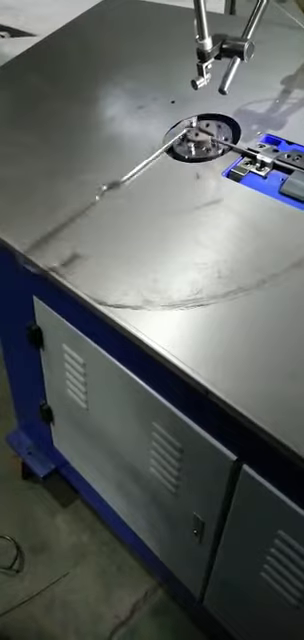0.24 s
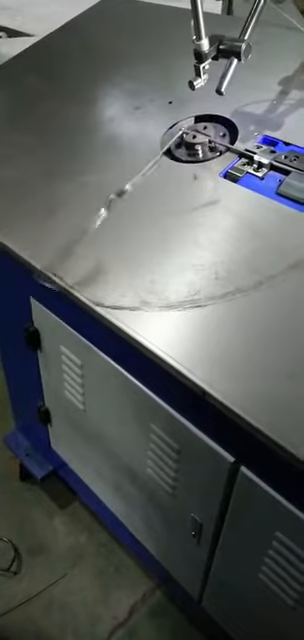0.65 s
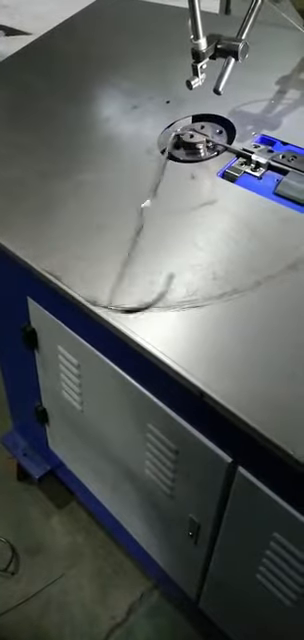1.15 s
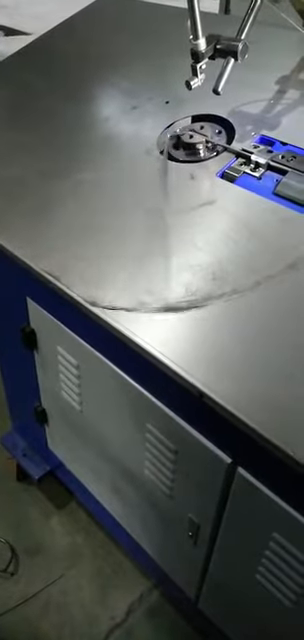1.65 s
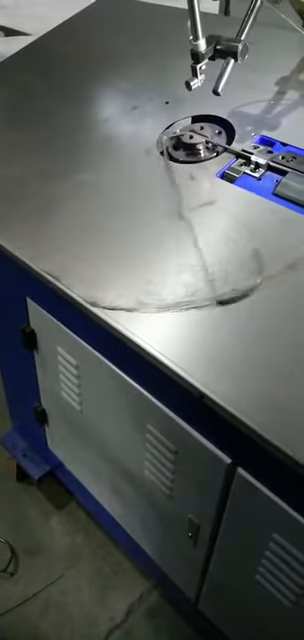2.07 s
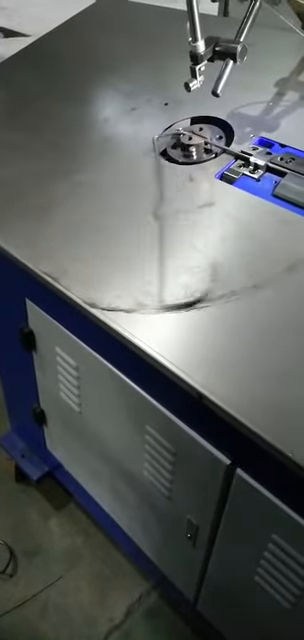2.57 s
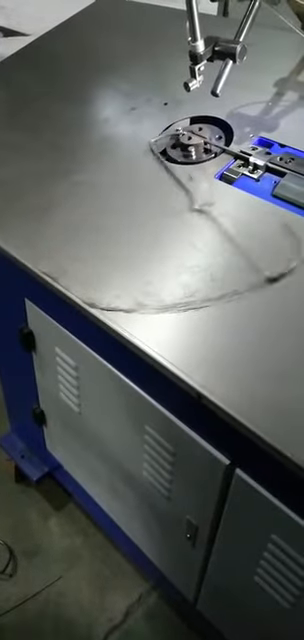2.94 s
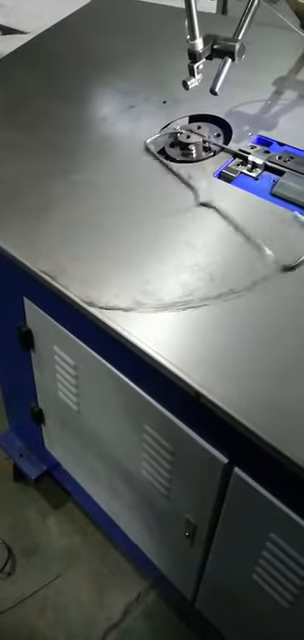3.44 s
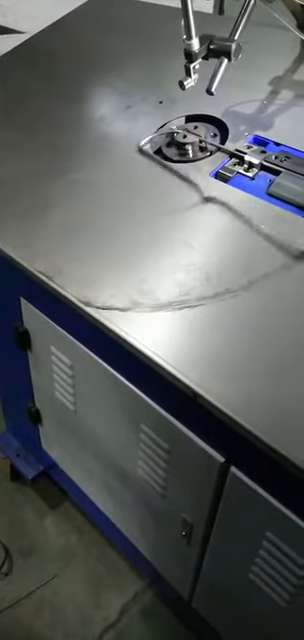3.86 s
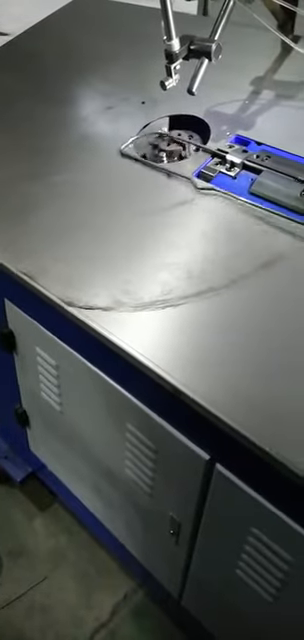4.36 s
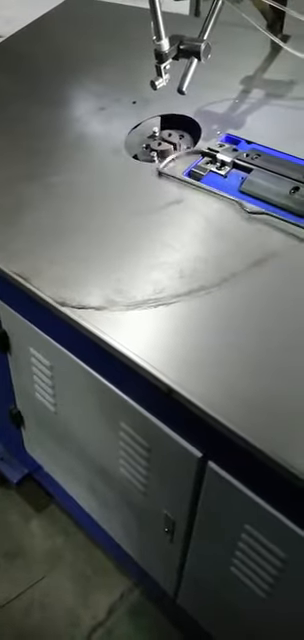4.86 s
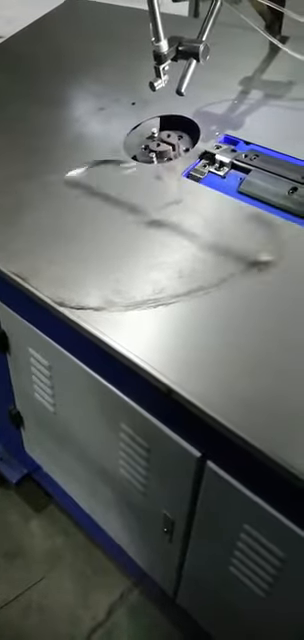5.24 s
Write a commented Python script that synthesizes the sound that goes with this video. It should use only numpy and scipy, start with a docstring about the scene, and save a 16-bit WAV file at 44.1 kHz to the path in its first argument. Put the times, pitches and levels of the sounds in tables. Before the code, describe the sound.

A wire-bending machine works in a workshop, heard close in stereo over its steel table. From the start the wire rubs the sheet with bright, gritty, uneven scraping, mostly toward the right, with fleeting singing tones. Light ticks and soft slaps fall around 0.25, 0.4, 0.57 and 1.02 s, while cabinet panels give faint low shudders. Scraping swells again near 1.2 s, eases around 1.7 s, and strengthens by 2.4 s, with clicks at 1.83, 2.24 and 2.64 s. From 3.05 to 3.75 s the contacts crowd together: sharp pings and dry chattering slaps, strongest around 3.26, 3.53 and 3.66 s. Softer rattles and rubbing follow until about 4.2 s, then the wire quiets, leaving hum and low drones. A short motor whine rises near 4.9 s; a quick clatter hits at 5.0 and 5.14 s, and scraping returns to the end.

```python
"""A steel wire scrapes over a sheet-steel table, then slaps and chatters on it, close to a two-port microphone.
Rubbing is uneven noise and blows are short chatters of noise, both coloured by the table's modes; hard ticks ping.
It is a wire-bending machine in a workshop: its cabinet booms on wavering tones and its motor whines shortly.
Behind it the drives drone as noise-rung resonances and the shop hums as patchy random spectra.
Table levels are nominal: each source sets them against its own offsets and port balance."""
import sys
import numpy as np
from scipy import signal
from scipy.io import wavfile
from scipy.ndimage import uniform_filter1d

SR = 44100
rng = np.random.default_rng(int(sys.argv[2]) if len(sys.argv) > 2 else 0)


def unload_audio(sound):
    """Save the sound as a 16-bit wav file, at the path given as the first command line argument."""
    columns = np.transpose(np.atleast_2d(sound))
    # keep every value between -1 and 1, then stretch to whole-number steps
    steps = np.round(np.clip(columns, -1, 1) * 32767)
    wavfile.write(sys.argv[1], SR, steps.astype(np.int16))


N = 242550  # samples: 5.5 s
PORT_SIDES = (.5, -.5)  # left, right: each port takes half of a left-minus-right level


def gain_of(db):
    """Decibels to gain."""
    return 10 ** (np.asarray(db) / 20)


def evened(x):
    """Scales to rms 1."""
    return x / np.sqrt(np.mean(x ** 2) + 1e-20)


def read(points, hz):
    """A spectrum table on a log-frequency axis."""
    f, value = np.transpose(points)
    return np.interp(np.log(hz + 1), np.log(f + 1), value)


def curves(rows):
    """The columns of a curve table at every sample."""
    s, *columns = np.transpose(rows)
    return [np.interp(np.arange(N) / SR, s, c) for c in columns]


def patches_of(shape, hz_bins, frames):
    """Random patches of rms 1 over frequency and time, smoothed along both."""
    across = uniform_filter1d(rng.standard_normal(shape), size=hz_bins, axis=0)
    return evened(uniform_filter1d(across, size=frames, axis=1))


def minimum_phase(gain):
    """Full causal spectrum with this gain and the least delay, found from the log gain."""
    log_gain = np.log(np.r_[gain, gain[-2:0:-1]])
    return np.exp(np.conj(signal.hilbert(log_gain)))


def colour(x, db, lo_hz, hi_hz, band_hz):
    """Causal filter for the part lo-hi of spectrum db, levelled by its unlimited spectrum within band_hz."""
    hz = np.fft.rfftfreq(2048, 1 / SR)
    inside = (hz > band_hz[0]) & (hz < band_hz[1])
    gain = gain_of(db) / np.sqrt(np.sum(gain_of(db[inside]) ** 2) / len(hz))
    gain = gain / np.sqrt((1 + (lo_hz / (hz + 1)) ** 12) * (1 + (hz / hi_hz) ** 12))
    taps = np.fft.ifft(minimum_phase(np.maximum(gain, 1e-5))).real
    return signal.oaconvolve(x, taps)[:N]


def lowpass(x, hz):
    """Steep low-pass."""
    taps = signal.firwin(1023, hz, window=("kaiser", 9), fs=SR)
    return signal.oaconvolve(x, taps[None], "same")


# modes of the table sheet: mode_hz, width_hz, prominence_db
TABLE_MODES = [(646, 39, 7.5), (2506, 160, -2), (2658, 56, 3), (3335, 290, 2), (1994, 36, 3), (3050, 38, 2),
               (4200, 64, 1.5), (5180, 76, 0.5), (5506, 65, 2), (6000, 200, 4.5), (4646, 100, 2),
               (6774, 680, 5.5), (7345, 490, 7), (8030, 600, 13.5)]
# colour difference of the two microphone ports: freq_hz, left_minus_right_db
PORT_COLOUR = [(500, 2.5), (1800, -7), (3000, -3.5), (4300, -9.5), (5300, -23.5), (6200, -13.5),
               (7200, -7.5), (8140, 6.5)]


def table(spectrum, side):
    """The sheet's spectrum with its modes standing out, as one port hears it."""
    hz = np.fft.rfftfreq(2048, 1 / SR)
    modes = sum(db / (1 + (2 * (hz - f) / width) ** 2) for f, width, db in TABLE_MODES)
    port_db = read(PORT_COLOUR, hz) - read(PORT_COLOUR, 5500)  # even at 5500 Hz
    return read(spectrum, hz) + modes + side * port_db


# wire sliding on the table: time_s, level_db, lower_steel_tones_db, left_minus_right_db
SLIDING = [(0, -38, -16.5, -16), (.17, -53, 5.5, -10), (.41, -45.5, -4.5, -9), (.6, -52, 8, -9.5),
           (.84, -49.5, 5, -10.5), (.95, -53.5, 2.5, -9), (1.2, -41.5, -7.5, -9), (1.7, -50, -1, -11),
           (2.4, -38, -10, -9), (3.15, -40.5, -9.5, -11.5), (3.4, -40, -11.5, -5), (3.62, -55.5, 0, -4),
           (3.75, -43.5, -10, -3.5), (4.12, -44, -8, -8), (4.35, -54, -1, -2.5), (4.93, -61.5, 5, -1.5),
           (5.01, -52.5, 1, -13), (5.5, -41.5, -9.5, -4)]
# spectrum of the rubbed table: freq_hz, density_db (per Hz)
RUBBED_STEEL = [(880, -36.5), (1500, -10), (1740, -11.5), (2110, -14), (2690, -7), (3000, -9.5),
                (3250, -9.5), (4410, -9), (5320, 3.5), (7500, -11.5), (9750, -43), (16500, -120)]


def scrape(level_db=-4.5, grit_db=1.5, flutter_db=1.0, crackle_db=-0.5, sing_db=-9.0, wander_db=5.0):
    """Dense uneven catches of the wire on the sheet; as the contact moves, single modes sing out and fade."""
    slide_db, middle_db, pan_db = curves(SLIDING)
    flutter = evened(uniform_filter1d(rng.standard_normal(N), 400))
    clumps = uniform_filter1d(rng.exponential(1, N) ** 2 - 2, size=50)  # about a millisecond each
    crackle = np.minimum(evened(clumps), 3)
    wander = uniform_filter1d(rng.standard_normal((len(TABLE_MODES), N // 256 + 1)), size=10, axis=1)
    sing_gain = gain_of(sing_db + wander_db * np.minimum(evened(wander), 1.5))
    sing_gain = np.repeat(sing_gain, 256, axis=1)[:, :N]
    shared = rng.standard_normal(N)  # both ports hear part of the same catches
    out = []
    for side, (skid_middle, skid_high) in zip(PORT_SIDES, skids()):
        catch_db = grit_db * np.minimum(rng.exponential(1, N), 4)
        catch_db = catch_db + flutter_db * flutter + crackle_db * crackle
        grit = evened((rng.standard_normal(N) + 0.43 * shared) * gain_of(catch_db))
        singing = sum(signal.lfilter(*signal.iirpeak(f, f / width, SR), g * grit)
                      for (f, width, _), g in zip(TABLE_MODES, sing_gain))
        grit = grit + singing
        slide = gain_of(level_db + slide_db + rests() + side * pan_db)
        db = table(RUBBED_STEEL, side)
        high = colour(grit * (slide + skid_high), db, 3710, 9960, (4500, 7600))
        middle = colour(grit * (slide * gain_of(middle_db) + skid_middle), db, 1480, 3680, (2000, 4000))
        out.append(high + middle)
    return np.array(out)


def rests(swing_s=0.395, first_turn_s=1.08, last_turn_s=2.9, rest_share=0.4, rest_db=-3.5):
    """Level of the sliding in dB: the swinging wire rests lightly on the sheet after each turn."""
    t = np.arange(N) / SR
    just_turned = (t - first_turn_s) / swing_s % 1 < rest_share
    resting = just_turned & (t > first_turn_s) & (t < last_turn_s)
    return rest_db * uniform_filter1d(resting * 1., size=1800)


# wire skidding in short soft strokes: start_s, peak_db, length_s
STROKES = [(0.08, -33, 0.0092), (0.18, -24, 0.11), (0.223, -27, 0.034), (0.307, -27, 0.021),
           (0.428, -30.5, 0.048), (0.497, -25, 0.034), (0.856, -28, 0.071), (0.924, -28.5, 0.063),
           (1.029, -18.5, 0.01), (1.252, -29, 0.018), (1.418, -27, 0.031), (1.44, -24.5, 0.0093),
           (1.627, -31.5, 0.15), (1.775, -25.5, 0.012), (1.817, -24, 0.04), (2.176, -35, 0.034),
           (2.637, -17, 0.019), (2.898, -27.5, 0.022), (3.034, -22, 0.028), (3.196, -20.5, 0.027),
           (3.547, -31, 0.019), (3.686, -24.5, 0.027), (3.757, -26, 0.019), (3.821, -27.5, 0.016),
           (4.237, -28.5, 0.027), (4.946, -33, 0.083), (5.152, -30, 0.018), (5.207, -26, 0.019),
           (5.227, -23.5, 0.019), (5.247, -31.5, 0.013)]


def skids(below_peak_db=-11.0, rise=0.28, onset=1.33, middle_db=-10, lean_db=3.5):
    """Pressure of short strokes near the sliding's place in the stereo: (port, middle or high part, time)."""
    pressure, pan_db = np.zeros(N), curves(SLIDING)[2] + lean_db
    for s, db, length in STROKES:
        u = np.arange(round(6 * length * SR)) / (rise * length * SR)
        stroke = (1 - np.exp(-onset * u)) * np.exp(-rise * u)
        part = pressure[round(s * SR):][:len(u)]
        part += gain_of(db + below_peak_db) * stroke[:len(part)]
    return [[pressure * gain_of(side * pan_db + db) for db in (middle_db, 0)] for side in PORT_SIDES]


# short dips in the rubbing: start_s, length_s
DIPS = [(0.27, 0.0098), (0.418, 0.0081), (3.174, 0.0038), (3.481, 0.0055), (3.516, 0.015), (4.986, 0.022),
        (5.14, .004)]


def dips(depth=0.65):
    """Share of the rubbing and wash left during short dips, with soft edges."""
    t = np.arange(N) / SR
    share = np.prod([1 - min(depth, 1) * ((t > s) & (t < s + length)) for s, length in DIPS], axis=0)
    return uniform_filter1d(share, size=88)


def shift(x, patchy_db=2.5):
    """The colour of the rubbing drifts in patches as the contact travels over the sheet."""
    z = signal.stft(x, nperseg=256)[2]
    patches = patches_of(z.shape[1:], 5, 12)
    gain = gain_of(patchy_db * patches - patchy_db ** 2 / 8.7)  # the offset makes up for the added power
    return signal.istft(z * gain, nperseg=256)[1][:, :N]


# wire slapping the table: start_s, peak_db, left_minus_right_db, low_knock_db, chatter_s, sharpness_db
SLAP_BLOWS = [(0.237, -32.5, -27, -27, 0.023, -1), (0.285, -24.5, -8, -32, 0.013, 14),
              (0.406, -28.5, 12, -46, 0.014, -9), (0.565, -28.5, -14, -25, 0.011, 6),
              (0.851, -32, 15, -20.5, 0.012, -10), (1.019, -30.5, -31, -46, 0.0037, 7),
              (1.375, -28, 1.5, -35, 0.0079, 16), (2.096, -32.5, -8, -7.5, 0.0026, -9),
              (2.231, -23, -6.5, -19.5, 0.02, 12), (2.541, -27.5, -1, -18.5, 0.0059, -2),
              (2.635, -34, -11, -43, 0.0069, 6), (3.164, -21.5, -9.5, -27.5, 0.0048, 12),
              (3.173, -20, 4, -41, 0.0094, -10), (3.198, -26, 1, -10, 0.0051, -8),
              (3.255, -29, -16.5, -22, 0.011, -13), (3.438, -26.5, -6.5, -17, 0.0082, -6),
              (3.489, -19, -7, -26, 0.0044, 9), (3.497, -21.5, 11, -26, 0.0043, -20),
              (3.526, -16, -1, -21.5, 0.014, -7), (3.66, -15.5, -7, -23.5, 0.0098, 4),
              (3.749, -16.5, -1.5, -18, 0.0084, 1), (3.939, -24.5, -4, -29, 0.008, -25),
              (4.051, -28, 10, -41, 0.017, -17), (4.101, -25.5, 3, -38, 0.014, -16),
              (4.148, -30, -12, -41, 0.0098, -9), (4.195, -24.5, 12, -42, 0.0086, -8),
              (4.973, -28.5, 0, -29, 0.011, 2), (4.997, -19.5, 5.5, -20.5, 0.0083, -12),
              (5.005, -24, -4, -28, 0.009, -10), (5.124, -25, 8, -21, 0.007, -5),
              (5.1402, -17.5, -2.5, -23, 0.0073, -16)]
# spectrum of the struck table: freq_hz, density_db (per Hz)
STRUCK_STEEL = [(240, -50.5), (400, -27.5), (720, -8.5), (1880, -18.5), (2620, -1), (3180, 0.5),
                (3850, -18.5), (4600, -1), (5430, 3.5), (6750, -2), (8500, -18), (11000, -45),
                (18700, -120)]


def slaps(snaps, chatter_db=(-4., -1.5, -9.), tail_db=-8.5, tail_t60=0.41, bounce_db=3.5):
    """Each slap is a short chatter of contacts and a quick ring, coloured by the spot it hits; a wash lingers.
    chatter_db: steady chatter under the peak in the low, middle and high part."""
    middle_base_db, middle_per_low, middle_per_tick = -16, 0.53, 0.29  # low knock and sharpness feed the middle
    bright_per_low = 0.48  # slaps with little low knock are brighter: dB per octave for each dB less
    rise_s, ring_t60 = 0.00043, 0.023  # rise at 0 dB sharpness (dull slaps rise slower); ring after the chatter
    t = np.arange(8192) / SR
    hz = np.fft.rfftfreq(len(t), 1 / SR)
    octaves = (hz > 4000) * np.log2(6200 / np.clip(hz, 1, 7500))  # below 6200 Hz, negative above
    blows, wash = np.zeros((2, 2, 3, N + len(t)))  # port, part of the spectrum, time
    for s, db, pan_db, low_db, length, tick_db in SLAP_BLOWS:
        middle_db = middle_base_db + middle_per_low * (low_db + 25.0) + middle_per_tick * tick_db
        noise = rng.standard_normal((2, len(t)))
        # contacts come in sub-millisecond clumps
        clumps = evened(uniform_filter1d(rng.exponential(1, len(t)) - 1, size=24))
        bounces = gain_of(bounce_db * np.minimum(clumps, 2))
        count = round((length + ring_t60 / 10) * SR)
        chatter = noise * bounces / np.sqrt(np.mean(bounces[:count] ** 2))
        chatter *= gain_of(-60 * np.maximum(t - length, 0) / ring_t60)
        chatter *= 1 - np.exp(-t * gain_of(tick_db) / rise_s)
        # every spot favours other modes
        spot = gain_of(5. * evened(uniform_filter1d(rng.standard_normal(len(hz)), size=70)))
        spot = spot * gain_of(bright_per_low * min(low_db - middle_base_db, 0) * octaves)
        spot_filter = minimum_phase(spot / np.sqrt(np.mean(spot ** 2)))
        chatter = np.fft.ifft(np.fft.fft(chatter) * spot_filter).real
        chatter *= gain_of(-60 * np.maximum(t - length - ring_t60, 0) / ring_t60)
        part_db = np.add.outer([pan_db / 2, -pan_db / 2], [low_db, middle_db, 0])
        level = gain_of(db + np.array(chatter_db) + part_db)[:, :, None]
        at = slice(round(s * SR), round(s * SR) + len(t))
        blows[:, :, at] += level * chatter[:, None]
        wash[:, :, at] += level * gain_of(tail_db - 60 * t / tail_t60) * noise[::-1, None, ::-1]
    # low, middle, high: lowest Hz, highest Hz, levelling band
    parts = ((454, 2520, (1120, 2200)), (2050, 3540, (2810, 4000)), (4470, 7680, (4840, 10450)))

    def strike(drive):
        """The sheet's answer to the drive at both ports."""
        return np.array([sum(colour(x, table(STRUCK_STEEL, side), *part) for x, part in zip(port, parts))
                         for port, side in zip(drive, PORT_SIDES)])
    return strike(blows + snaps), strike(wash)


# single hard contacts of wire on steel: peak_s, peak_db, ring_hz, left_minus_right_db
CONTACTS = [(.2435, -20, 5850, -15), (.2489, -23, 5840, -11), (.2874, -21, 4760, -10),
            (.5691, -19, 5490, -21), (.5753, -23, 5530, -19), (1.0246, -20, 6190, -18),
            (1.0294, -21, 6440, -7), (1.8327, -25, 5670, -10), (1.8391, -22, 5360, -14),
            (2.2398, -21, 5190, -17), (2.6401, -18, 5530, -10), (2.6426, -19, 5890, -9),
            (3.0417, -23, 5450, -10), (3.0462, -22, 5340, -11), (3.0492, -22, 5490, -7),
            (3.168, -19, 6430, -4), (3.2055, -18, 6170, -10), (3.2628, -13.5, 5610, -20),
            (3.4418, -24, 5990, -14), (3.4914, -19, 6280, -7), (3.5307, -15, 5290, -9),
            (3.7541, -22, 5860, -5), (3.7608, -19, 5650, -1), (4.1993, -27, 6850, 2),
            (5.0006, -24, 6720, 6), (5.0036, -23, 5650, -3), (5.1371, -27, 5760, 0),
            (5.1444, -21, 5750, -10), (5.1461, -19, 5580, -9), (5.1512, -26, 5530, -9),
            (5.2276, -27, 5440, -8)]


def ticks(ring_db=-1.5, snap_db=(-13., 0., 1.), rise_s=.0006):
    """Each contact is a millisecond ping of its own pitch, plus an impulse into the table (low, middle, high)."""
    t = np.arange(256) / SR
    u = t / rise_s
    pings, snaps = np.zeros((2, N + 8192)), np.zeros((2, 3, N + 8192))
    for (s, db, hz, pan_db), (phase, lag) in zip(CONTACTS, rng.random((len(CONTACTS), 2))):
        ports = gain_of([pan_db / 2, -pan_db / 2])
        level = gain_of(db) * ports / ports.mean()
        at = round((s - rise_s) * SR)
        wave = np.sin(2 * np.pi * (hz * t + phase + np.array([[0], [0.18 * lag]])))
        pings[:, at:at + len(u)] += gain_of(ring_db) * level[:, None] * u * np.exp(1 - u) * wave
        snaps[:, :, at] += np.outer(level, gain_of(snap_db))
    return pings[:, :N], snaps


# cabinet panels shuddering as the drive jerks: panel_hz, shudder_s, list of (middle_s, peak_db)
PANELS = [(78.2, 0.091, [(.163, -43), (.3, -41), (.37, -48), (.45, -49), (.92, -42), (1.73, -50.5),
          (2.11, -48), (2.51, -47)]), (122, 0.07, [(1.37, -48), (3.0, -50.5), (4.51, -50), (4.59, -47.5),
          (4.7, -49), (4.87, -57)]), (159.3, 0.12, [(1.39, -45), (1.78, -43.5), (1.97, -55), (2.09, -47),
          (2.23, -48), (2.551, -49)]), (212, 0.11, [(.348, -50), (.99, -50), (1.49, -47), (1.7, -50.5)])]
# drive motor whine, rising then sinking: time_s, pitch_hz, level_db
MOTOR_WHINE = [(4.8, 370, -67), (4.947, 408.5, -48.5), (5.0, 390, -57)]


def cabinet(rough=0.52, skirt=0.17, waver=0.025):
    """Panels swell and fade on wavering tones, nearer the right port; the motor whines shortly."""
    t = np.arange(N) / SR
    drift = 1 + waver * evened(uniform_filter1d(rng.standard_normal(N), size=1500))
    turns = 2 * np.pi * np.cumsum(drift) / SR
    a, b = evened(uniform_filter1d(rng.standard_normal((2, 2, N)), size=700, axis=2))
    # spreads each tone into a rough band
    throb = (1 + rough * (a[0] + 1j * a[1] + .5 * b)) / np.sqrt(1 + 2 * rough ** 2)
    boom = np.zeros((2, N), complex)
    jerks = [(s, hz, db, length) for hz, length, rows in PANELS for s, db in rows]
    for (s, hz, db, length), (phase, lag) in zip(jerks, rng.uniform(-1.34, 1, (len(jerks), 2))):
        u = (t - s) / length
        swell = np.sqrt(2) * gain_of(db) * (np.exp(-(2 * u) ** 2) + skirt * np.exp(-u ** 2 / 2))
        port_lag = np.array([[0], [.5 * lag]])  # radians
        boom += swell * np.exp(1j * (hz * turns + np.pi * phase + port_lag))
    hz, db = curves(MOTOR_WHINE)
    on = np.clip(np.minimum(t - MOTOR_WHINE[0][0], MOTOR_WHINE[-1][0] - t) / 0.021, 0, 1)
    tone = np.sin(2 * np.pi * np.cumsum(hz * drift ** 0.24) / SR)
    whine = on * gain_of(db) * np.sqrt(2) * tone
    return ((boom * throb).real + whine) * gain_of([[-2.5], [2.]])


# fuzzy tones of the drives: pitch_hz, width_hz, level_db (before the hum's rise and fall)
DRIVE_TONES = [(335.7, 25, -60), (420.8, 21, -62), (774, 86, -58), (1059.4, 12, -60.5)]


def drones(waver_db=4.0):
    """Narrow resonances rung by noise, each swelling and fading by itself over the hum."""
    tones = np.zeros((2, N))
    for hz, width, db in DRIVE_TONES:
        shared, left, right, swell = rng.standard_normal((4, N))
        swell_db = waver_db * evened(uniform_filter1d(swell, size=4000))
        drive = shared + 0.93 * np.array([left, right])
        ringing = evened(signal.lfilter(*signal.iirpeak(hz, hz / width, SR), drive))
        tones += gain_of(db + swell_db) * ringing
    return tones * gain_of(curves(SHOP_LEVEL)[0] + 47.5)


# shop hum and drives in the background: time_s, level_db
SHOP_LEVEL = [(0, -49), (.84, -47.5), (1.09, -50.5), (1.41, -49), (1.79, -49), (2.3, -48), (3.11, -50),
              (3.3, -54), (3.65, -56), (4.3, -55), (4.45, -48), (4.95, -49.5), (5.0, -54.5), (5.33, -56),
              (5.5, -51)]
# spectrum of the hum: freq_hz, density_db (per Hz)
HUM_SPECTRUM = [(12, -44.5), (20, -11.5), (122, -1.5), (157, -2.5), (433, -12.5), (502, -13.5), (1130, -15),
                (1270, -17.5), (2230, -23.5), (3650, -33), (3940, -50), (4350, -48), (7500, -57),
                (9750, -83), (16500, -120)]
# likeness of the two ports: freq_hz, likeness (1 = same)
PORT_LIKENESS = [(60, 0.84), (200, 0.91), (700, 0.36), (2390, 0.018), (8140, 0.06)]
# stereo lean of the hum: freq_hz, left_minus_right_db
HUM_LEAN = [(60, 0), (200, -6), (700, -2), (2390, -1.5), (8140, -13.5)]


def shop(patchy_db=1.94, bass_db=-0.5, bass_db_per_s=-0.32):
    """Random short-time spectra with drifting patches, most alike in the bass, which thins with time."""
    frames, hz = N // 256 + 5, np.fft.rfftfreq(1024, 1 / SR)
    a, b, c, d = rng.standard_normal((4, len(hz), frames))
    patches = patches_of((len(hz), frames), 10, 12)
    same = np.clip(read(PORT_LIKENESS, hz), -1, 1)[:, None]
    left = a + 1j * b
    right = same * left + np.sqrt(1 - same ** 2) * (c + 1j * d)
    lean_db = np.multiply.outer(PORT_SIDES, read(HUM_LEAN, hz))
    hum_db = (read(HUM_SPECTRUM, hz) + lean_db)[:, :, None]
    z = np.array([left, right]) * gain_of(hum_db + patchy_db * patches)
    bass = (1 / (1 + (hz / 300) ** 6))[:, None]
    body = ((hz > 300) & (hz < 1500))[:, None]  # sets the level of the rest
    low, rest, band = (signal.istft(z * mask, nperseg=1024, noverlap=768)[1][:, :N]
                       for mask in (bass, 1 - bass, body))
    level_db, = curves(SHOP_LEVEL)
    bass_gain = gain_of(bass_db + bass_db_per_s * np.arange(N) / SR)
    return gain_of(level_db) * (bass_gain * evened(low) + rest / np.sqrt(np.mean(band ** 2)))


def scene():
    """Rubbing, hum, drones and cabinet are low-passed at 7500 Hz; slaps and pings reach higher."""
    pings, snaps = ticks()
    blows, wash = slaps(snaps)
    rubbing = dips() * shift(wash + scrape())
    soft = rubbing + shop() + drones() + cabinet()
    return pings + blows + lowpass(soft, 7500)


def record(dry):
    """Low-passes the whole sound at 8450 Hz."""
    return lowpass(dry, 8450)


dry = scene()
out = record(dry)
unload_audio(out)
```